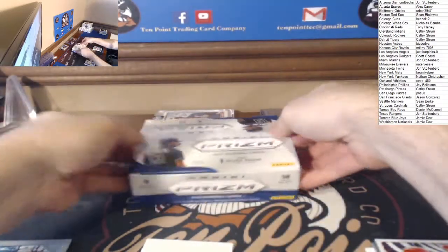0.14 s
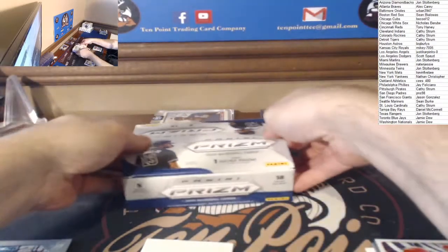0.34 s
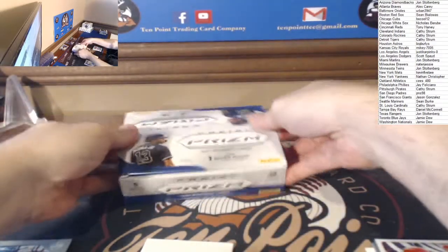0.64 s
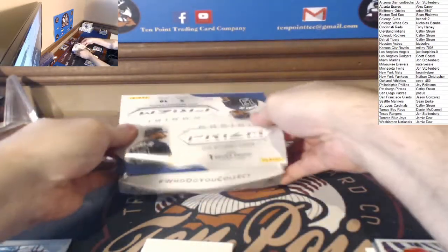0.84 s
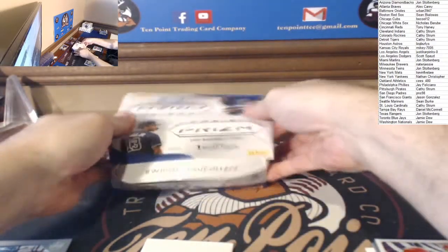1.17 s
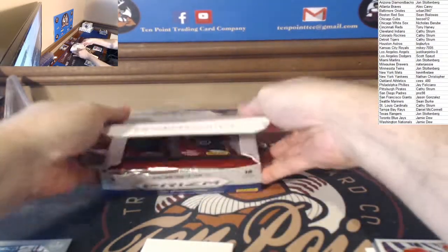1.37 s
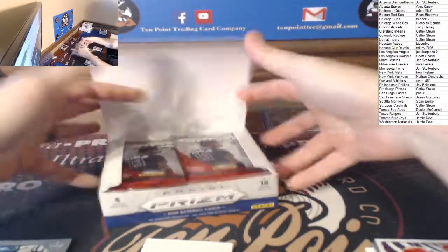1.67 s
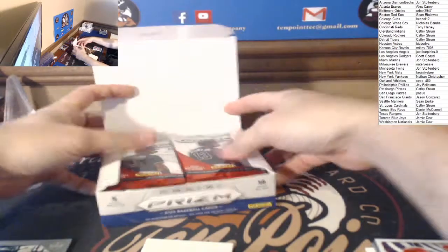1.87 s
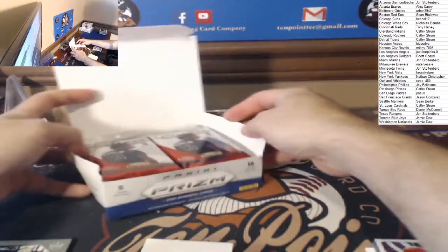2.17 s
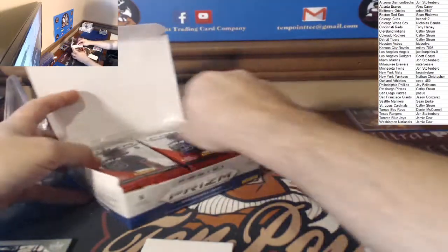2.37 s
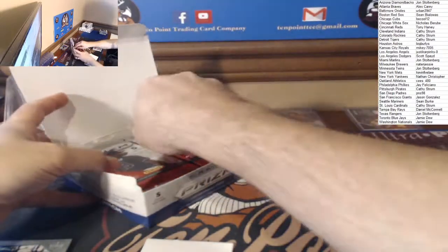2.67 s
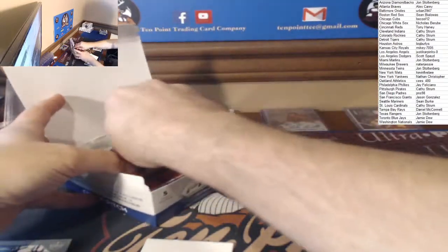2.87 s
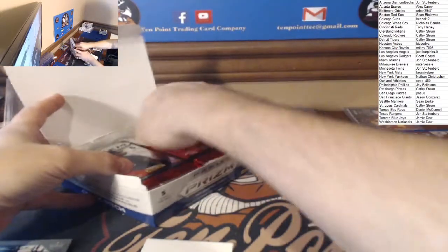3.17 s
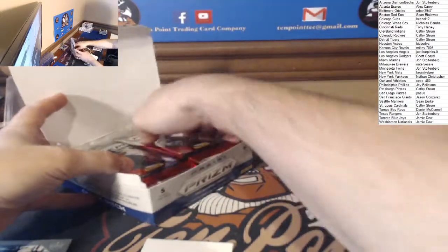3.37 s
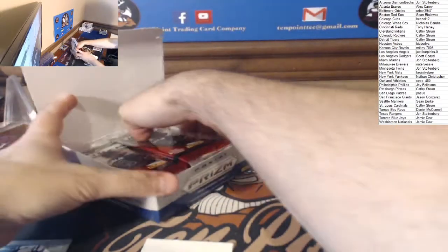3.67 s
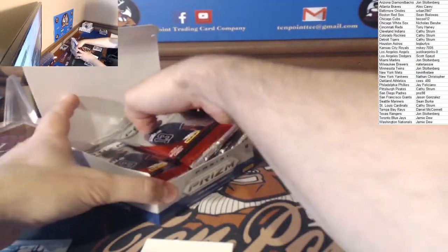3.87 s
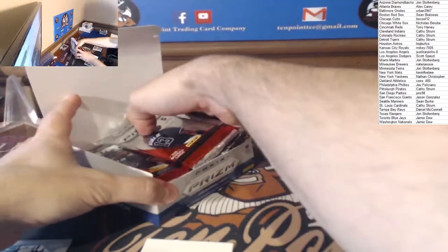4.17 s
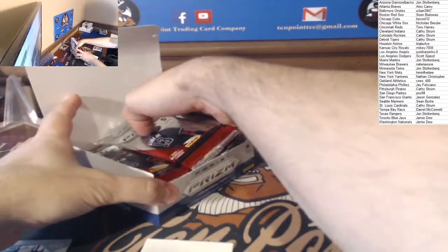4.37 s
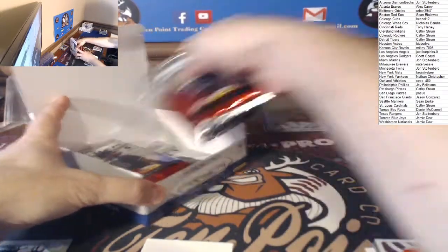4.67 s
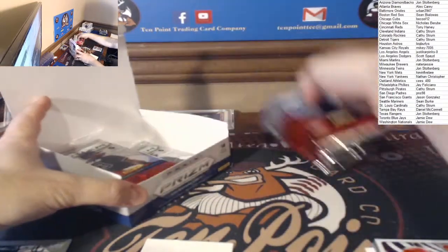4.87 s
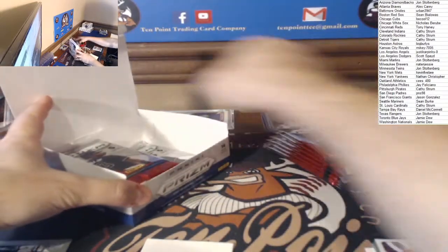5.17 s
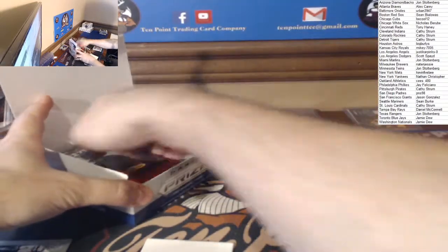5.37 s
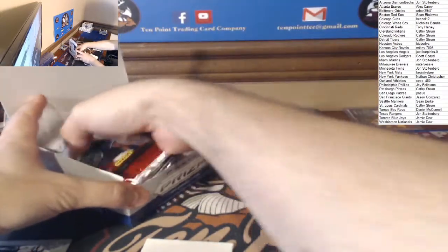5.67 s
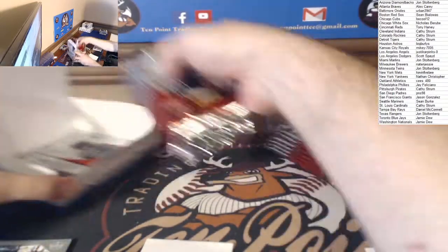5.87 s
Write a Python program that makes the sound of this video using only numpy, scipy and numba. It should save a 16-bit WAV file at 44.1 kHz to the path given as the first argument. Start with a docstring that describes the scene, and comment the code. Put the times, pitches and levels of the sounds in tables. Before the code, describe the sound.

Close, dry card rubs and hollow snaps, a faint lid creak, then busy foil crinkling as two stacks of packs are pulled out.

```python
"""Faint rubs and snaps of card come first: a box of trading cards is opened by hand on a padded mat.
Its lid rubs (stick-slip grains), creaks (gliding sines, low knocks), snaps free of its tabs and is
folded back. Then two stacks of foil packs are gripped, dragged out crinkling (showers of clicks ringing
small facets) and set down with soft low bumps (decaying sines and noise puffs). A small room answers with
early echoes and a decaying noise tail; a close, nearly mono desk microphone listens over faint noise."""
import sys
import numpy as np
from scipy import signal
from scipy.fft import rfft, irfft, next_fast_len
from scipy.io import wavfile
from scipy.ndimage import uniform_filter1d, map_coordinates
from numba import njit

SR = 44100
rng = np.random.default_rng(int(sys.argv[2]) if len(sys.argv) > 2 else 0)


def store_pcm(level_fs):
    """Save levels as 16-bit WAV."""
    pcm = np.round(np.clip(level_fs, -1, 1) * 32767).astype(np.int16)
    wavfile.write(sys.argv[1], SR, np.atleast_2d(pcm).T)


N = 265482
TIME = np.arange(N) / SR


def cardboard():
    """Superposition: the rubs, squeaks and snaps add linearly."""
    return rubs() + card_squeaks() + card_snaps()


# card edges and tabs snapping; bass and treble are relative to the middle, before the shared trims:
# start_s, level_db, bass_db, treble_db, ring_hz, slip_ms
CARD_SNAPS = [(0.1307, -33, -17, -14.5, 870, 2.2), (0.1694, -48, -26, -31, 980, 7.7),
              (0.2233, -44.5, -31, -1.5, 1390, 1.6), (0.2357, -37, -31, -35, 1370, 3.8),
              (0.252, -47, -25, 11, 1870, 1.5), (0.3525, -46.5, -20, -34, 1220, 12.5),
              (0.3724, -49.5, -23, -4, 1470, 1.1), (0.4016, -30, -10.5, -4, 1180, 2.9),
              (0.4069, -34, 3, -26, 900, 4.3), (0.4172, -40, -23, -3, 1110, 1.3),
              (0.4675, -25, -6, -23, 1370, 1.8), (0.5686, -21.5, -9.5, -25, 1410, 1.34),
              (0.5938, -28.5, -3, -22, 1350, 0.5), (0.6005, -27.5, 0, -21, 1460, 2.4),
              (0.7343, -44, -19, -23, 1260, 3.3), (0.786, -31, -5, -19, 1274, 1.6),
              (0.7909, -21, -45, -37, 1266, 0.32), (0.7939, -21.5, 11, -1.5, 940, 5.8),
              (0.8249, -24, -30, -7.5, 1780, 9.6), (0.8355, -16.5, -2.5, -35, 1100, 2.8),
              (0.8687, -27, -5.5, -6.5, 2410, 11.6), (1.1317, -27, -6, -15.5, 1700, 3.8),
              (1.1641, -32, 3.5, -5.5, 1597, 2.2), (1.1848, -27.5, -18, -10, 1690, 1.5),
              (1.2117, -37.5, -7, -5, 1390, 1.9), (1.2214, -38.5, -13, -13, 1260, 1.2),
              (1.2329, -37.5, -4.5, -6, 1326, 1.7), (1.2897, -11.5, -14.5, -14, 1230, 2),
              (1.292, -7, -12, -18.5, 1236, 3), (1.2955, -19, 1.5, -8, 2250, 1.3),
              (1.3055, -22, 5, -1, 1360, 9.5), (1.3122, -9, -3, -14.5, 1860, 2.6),
              (1.3142, -13.5, -13, -22, 1089, 3.9), (1.486, -49, -3, 1, 1300, 5.6),
              (1.509, -43.5, -14, 20, 1260, 2.5), (1.559, -49, -6, 1, 5800, 3.5),
              (1.5885, -42, -5, 16, 6490, 3.4), (1.622, -48, 6.5, -5.5, 1050, 3.6),
              (1.641, -57, 16, 2, 3300, 4.4), (1.6765, -30.5, -17.5, -3.5, 1710, 3.4),
              (1.6816, -35.5, -37, -2.5, 1560, 6.6), (1.8344, -45, 13, 14, 3490, 0.97),
              (1.8802, -38, 1, -17.5, 457, 10.1), (1.9384, -42, -21, -21.5, 2350, 3.6),
              (1.9684, -46.5, -5.5, 13, 4500, 1.07), (2.1215, -40, -5.5, -3.5, 935, 2.3),
              (2.173, -37.5, 0.5, -3, 497, 4.3), (2.2641, -41, -14.5, 29, 5100, 2.16),
              (2.7021, -41.5, -18.5, -2, 1890, 2.6), (2.752, -56.5, -7, -16, 900, 8),
              (2.797, -60, 8.5, -4.5, 1297, 14.3)]


def card_snaps():
    """Impulse excitation: sudden releases of edges and tabs set the hollow box ringing."""
    return snaps(CARD_SNAPS, box, rough=0.12, ring_q=5, ring_db=8, bass_db=1.5, treble_db=-2,
                 after_db=-23, after_ms=14, after_per_s=770, facet_db=0)


# strokes of fingers and flaps over the card, later of fingers and packs sliding; level is at the
# start, before the mix trim, and swell is its change over the stroke; bass and treble are relative
# to the middle: start_s, length_s, level_db, swell_db, bass_db, treble_db, ring_hz
RUB_STROKES = [(0.0, 0.024, -39.5, -33.5, -1.5, -23, 1340), (0.045, 0.039, -66, 11, -18, -5, 850),
               (0.09, 0.037, -58.5, 12, -2, -15, 950), (0.15, 0.061, -48, -18, -21, -12, 1000),
               (0.222, 0.074, -59.5, 6, -12, -4.5, 1330), (0.29, 0.1, -48, -23, -13, -17, 1090),
               (0.405, 0.069, -57.5, -9.5, 8, -19, 1100), (0.475, 0.07, -51, -13, 10, -12.5, 1050),
               (0.631, 0.1, -51, -26, 4, -17, 1160), (0.745, 0.038, -51.5, -5.5, -22, -9, 1350),
               (0.8, 0.052, -50, 19.5, -8.5, -14, 1180), (0.835, 0.079, -36.5, -12.5, -2, -8, 2440),
               (0.89, 0.096, -44.5, 2.5, -2.5, -20, 1140), (1.0, 0.11, -45, -9.5, 0.5, -28, 1360),
               (1.135, 0.037, -40, 1, -1.5, -13, 1060), (1.18, 0.064, -50.5, 2, -10, -9, 1330),
               (1.315, 0.17, -34.5, -24, 0.5, -30, 1250), (1.32, 0.079, -41, -11, -17, -7.5, 3396),
               (1.45, 0.059, -59.5, 15, -14, -6, 1200), (1.55, 0.065, -62, 1, -4, 6.5, 790),
               (1.615, 0.052, -51, -14, -7, -5, 2760), (1.672, 0.026, -44.5, -17, 3.5, 3.5, 1580),
               (1.835, 0.015, -54.5, 0.5, -10.5, -12.5, 2960), (1.917, 0.055, -61, 9, -5.5, 1, 2597),
               (2.11, 0.089, -49.5, -2.5, -7, -8, 2300), (2.225, 0.086, -50.5, -14.5, -8.5, -10.5, 2500),
               (2.34, 0.064, -66.5, -13.5, 12.5, -7.5, 700), (2.42, 0.13, -79.5, -5, -0.5, -8.5, 900),
               (2.55, 0.055, -67.5, -8, -2.5, -8, 791), (2.712, 0.023, -62, -2.5, -3.5, -13, 1700),
               (4.14, 0.085, -45, -21.5, -17, -15.5, 944), (4.338, 0.019, -44.5, -4, -10, -19.5, 1990),
               (4.358, 0.074, -53, -19, -1.5, -15, 1473), (5.755, 0.089, -62, -16, 5.5, -16, 555)]
# spectral envelope of the friction: frequency_hz, level_db (relative)
RUB_SPECTRUM = [(29, -58), (50, -32), (132, -26.5), (203, -7), (299, -2.5), (423, -8.5), (524, -3),
                (584, -5), (843, -7.5), (1100, -3.5), (1440, -1.5), (1850, -4), (2300, -7.5), (3070, -13.5),
                (3800, -18.5), (4900, -14.5), (6540, -23.5), (7940, -31), (8650, -41), (11200, -78),
                (19000, -120)]


def rubs():
    """Stick-slip friction: fibres catch and slip, heard directly and through the box; gloss ticks finely."""
    fibres = grains(per_s=3400, spread_db=0.5, even_s=0.0061)
    catches = grains(per_s=260, spread_db=2, even_s=0.02)
    slips = rms_one(fibres) + from_db(-3) * rms_one(catches)
    slips = facets(slips, q=3.4, patchy_db=3.5, change_rate=60)
    slips = pocket(slips, gap_ms=1.3, wander=0.3, change_rate=25, echo_db=-8)
    slips = rms_one(colour(slips, RUB_SPECTRUM))

    hollow = box(grains(per_s=1500, spread_db=3, even_s=0.006))
    hollow = rms_one(butter(hollow, 1900, "low", order=4))

    gloss = grains(per_s=240, spread_db=2.5, even_s=0.02)
    for _ in range(2):
        gloss = resonance(gloss, hz=6000, width_hz=2600)

    friction = slips + from_db(-2.5) * hollow + from_db(-15) * rms_one(gloss)
    rubbed = strokes(RUB_STROKES, friction, attack_s=0.005, release_s=0.006,
                     ring_db=-2, ring_q=4, ring_rise=0.25)
    return from_db(-2.5) * rubbed


# squeaks as the box is turned and its flap bent; pitch is at the start, before it wavers, and
# level is before the flutter: start_s, length_s, pitch_hz, rise_hz, level_db
SQUEAKS = [(1.015, 0.076, 254, 34.7, -57.5), (1.801, 0.027, 380, 132, -59.5),
           (1.88, 0.04, 385.1, 49.7, -56.5), (1.929, 0.02, 810, 27, -48), (2.131, 0.102, 440, 90.5, -53.5),
           (2.229, 0.08, 707, 23.2, -59.5), (2.342, 0.066, 268, 50.3, -57.5)]


def card_squeaks(wander=0.075, flutter_db=6.5, flutter_rate=200):
    """Periodic stick-slip: short unsteady tones rise in pitch as the slip speeds up."""
    out = np.zeros(N)
    waver = 1 + wander * drift(flutter_rate)
    for start_s, length_s, pitch_hz, rise_hz, level_db in SQUEAKS:
        t = TIME - start_s
        pitch = (pitch_hz + rise_hz * np.clip(t / length_s, 0, 1)) * waver
        tone = np.sin(2 * np.pi * np.cumsum(pitch) / SR)
        out += from_db(level_db) * envelope(t, length_s, attack_s=0.0048, release_s=0.0037) * tone
    return out * from_db(flutter_db * drift(flutter_rate))


# resonances of the box, added with alternating sign: frequency_hz, width_hz, level_db (relative)
BOX_MODES = [(160, 22, -14.5), (315, 97, 1), (540, 92, 3), (673, 86, 8.5), (900, 170, 12.5),
             (1230, 240, 11), (1442, 200, 15), (2010, 857, 5.5), (2300, 290, -8.5), (3240, 300, -33.5),
             (5000, 170, -24), (5300, 700, -28.5), (7100, 1400, -13)]


def box(force):
    """Modal superposition: card panels and enclosed air ring together, all setting in at once."""
    grid = np.geomspace(30, 20000, 300)
    response = 0
    for k, (hz, width_hz, level_db) in enumerate(BOX_MODES):
        detuning = (grid ** 2 - hz ** 2) / (grid * width_hz)
        response = response + (-1) ** k * from_db(level_db) / (1 + 1j * detuning)
    return colour(force, np.transpose([grid, 20 * np.log10(np.abs(response))]))


def foil_packs():
    """Superposition: sliding wrappers rustle while single creases buckle."""
    return foil_rustle() + foil_buckles()


# spectral envelope of the foil: frequency_hz, level_db (relative)
FOIL_SPECTRUM = [(35, -63), (60, -38.5), (150, -25), (220, -11.5), (330, -5), (451, -3.5), (540, 3),
                 (680, -2.5), (974, 4.5), (1250, 0), (1820, 2), (2290, -1.5), (2600, -3.5), (3600, -13.5),
                 (4730, -16.5), (6300, -19.5), (7400, -20.5), (8650, -31.5), (11200, -84), (19000, -120)]
# tugs and slides of the packs; level is at the start, before the mix trim, and swell is its
# change over the tug; bass and treble are relative to the middle:
# start_s, length_s, level_db, swell_db, bass_db, treble_db, ring_hz
TUGS = [(2.947, 0.051, -55, 11, 2.5, -5, 970), (3.02, 0.15, -55, 11.5, -2.5, -9.5, 606),
        (3.135, 0.034, -39.5, -11.5, -23, -2, 5360), (3.2, 0.1, -49, 10.5, -5, -6.5, 525),
        (3.29, 0.18, -51.5, 8, -2, -6.5, 1900), (3.475, 0.073, -47.5, 9, -17, -12, 650),
        (3.53, 0.029, -49, -3, -15, -4, 1900), (3.56, 0.071, -43, 4.5, -12.5, -8.5, 1700),
        (3.605, 0.039, -43, 15, -10.5, -11.5, 1010), (3.65, 0.041, -34, 3, -11.5, -4, 1040),
        (3.705, 0.05, -45, 16.5, -25, -8, 1400), (3.735, 0.075, -41.5, 10.5, -4.5, 1.5, 1870),
        (3.82, 0.06, -36, -8, 4, -5, 980), (3.872, 0.027, -39.5, -0.5, -4.5, -7.5, 1750),
        (3.9, 0.091, -43, -5, -18, -9.5, 980), (3.961, 0.039, -42, -1, -7, -13, 970),
        (4.02, 0.025, -41.5, -2, -11.5, -12, 1110), (4.13, 0.31, -60.5, -29.5, -16, -14.5, 2970),
        (4.232, 0.015, -44.5, -2.5, 1.5, -10, 1400), (4.4, 0.055, -62.5, 7, -9, -3.5, 7100),
        (4.49, 0.035, -59.5, -12, 12, -1.5, 2320), (4.53, 0.035, -57.5, 19.5, -10, -1.5, 1760),
        (4.6, 0.044, -31, -8.5, -10, -2.5, 900), (4.685, 0.016, -53.5, -1, 0, -34.5, 815),
        (4.78, 0.24, -84.5, 8, -1.5, 4.5, 1950), (4.955, 0.037, -45, -16, -19, -5, 1684),
        (5.01, 0.039, -46.5, -22, 3.5, 8, 4900), (5.36, 0.15, -81.5, 13, 10, 5, 1947),
        (5.438, 0.0099, -41, -0.5, -10, -5, 820), (5.495, 0.12, -54.5, 1, -16, -6, 1050),
        (5.54, 0.041, -43, -7, -11, -4, 795), (5.595, 0.066, -49, 16, -6.5, -4, 1070),
        (5.668, 0.069, -40.5, 5, -0.5, 0, 2000), (5.76, 0.13, -47.5, -17.5, -19, -6.5, 2170)]


def foil_rustle():
    """Shot noise: wrappers slide while their creases buckle in showers of fine clicks."""
    creases = grains(per_s=650, spread_db=2.3, even_s=0.014)
    creases = facets(creases, q=7, patchy_db=5, change_rate=130)
    sliding = grains(per_s=4000, spread_db=1.5, even_s=0.0098)
    sliding = facets(sliding, q=3.4, patchy_db=3, change_rate=60)
    ticks = crackle(per_s=330, spread_db=1.5, q=6)
    sheet = rms_one(creases) + from_db(-4) * rms_one(sliding)
    sheet = pocket(sheet, gap_ms=1.4, wander=0.35, change_rate=30, echo_db=-7)
    crinkle = colour(rms_one(sheet) + from_db(-4) * ticks, FOIL_SPECTRUM)
    tugs = strokes(TUGS, crinkle, attack_s=0.0026, release_s=0.01, ring_db=0, ring_q=6, ring_rise=0.12)
    return from_db(-4.5) * tugs


# single buckles of the wrappers; level is before the mix trim, treble is relative to the middle
# before the shared trim: start_s, level_db, treble_db, ring_hz, slip_ms
FOIL_SNAPS = [(2.9481, -38, -0.5, 417, 6.5), (2.976, -38, 1, 1000, 11), (2.9868, -31, 3, 1720, 9.5),
              (3.0272, -37, 6, 4900, 1.8), (3.0345, -36.5, -4, 2010, 2.3), (3.0595, -34.5, 5.5, 6900, 7),
              (3.077, -35.5, 21, 4230, 1.4), (3.0961, -31, -8, 2020, 4.1), (3.1035, -52, -14, 2000, 1.2),
              (3.1213, -43, -23, 654, 4), (3.187, -33.5, -11, 750, 6.6), (3.246, -31.5, -1, 4600, 1.1),
              (3.2551, -29.5, 4, 4000, 2), (3.275, -30.5, 5, 1000, 1.3), (3.341, -34.5, -10, 5000, 1),
              (3.3227, -25, 1, 5130, 0.42), (3.353, -29, -0.5, 5340, 1.7), (3.382, -35, -2, 1900, 1.8),
              (3.3978, -26, -2, 1970, 21), (3.4284, -38, 2, 2500, 2.1), (3.496, -45, 0, 2230, 1),
              (3.5401, -25, -7, 2440, 4.4), (3.5515, -24, -2, 1780, 0.54), (3.5688, -32.5, 4, 2120, 3),
              (3.6501, -20.5, -16, 1570, 3.4), (3.6774, -25, -13, 1450, 1.5),
              (3.692, -23.5, -18, 1360, 5.3), (3.736, -24, -12, 1600, 3.9), (3.748, -18, -11, 990, 1.4),
              (3.7754, -20, 8, 2000, 2.4), (3.7869, -17.5, 2.5, 3750, 8.7), (3.809, -24.5, -17, 4170, 2.8),
              (3.8365, -20, -26, 1000, 1.5), (3.878, -21.5, 4, 3570, 4.3), (3.8928, -19.5, -2.5, 1810, 2.7),
              (3.92, -25.5, -34, 1380, 1), (3.931, -31, -9, 2180, 0.9), (3.964, -31.5, 3, 4300, 2.5),
              (3.9696, -24, -15, 980, 4.4), (3.9794, -26.5, 4, 4500, 1.1), (3.992, -44, -3, 4300, 1),
              (4.0102, -31, 5, 3110, 0.5), (4.0308, -29, -6.5, 2120, 2.9),
              (4.1309, -27.5, 10.5, 4000, 0.21), (4.1613, -33.5, 4, 1100, 0.57),
              (4.2331, -34, -23.5, 1330, 3.4), (4.246, -45, -2.5, 1470, 2), (4.235, -38, 23, 6900, 9.7),
              (4.3509, -25, -22.5, 1265, 0.32), (4.4434, -41, 22, 6860, 7.9),
              (4.4926, -38, -10.5, 530, 0.22), (4.539, -34, 2, 6550, 1.5), (4.5646, -30.5, -22, 2940, 3),
              (4.601, -32.5, 3, 1900, 3.2), (4.6095, -29, -22, 925, 8.1), (4.629, -23.5, 4, 3460, 1.5),
              (4.655, -32.5, 2, 1990, 4.1), (5.008, -32.5, 7.5, 1100, 0.66), (5.0132, -25, 13.5, 5730, 1.1),
              (5.025, -49.5, 16.5, 4920, 0.77), (5.312, -60, -2.5, 1300, 4.7),
              (5.3542, -44.5, 1.5, 1160, 8.7), (5.367, -54.5, 6.5, 6500, 2.1),
              (5.396, -47.5, 24, 5000, 1.1), (5.4471, -34, -2.5, 1170, 4.4), (5.49, -35.5, -4, 1320, 2),
              (5.5115, -41, -6, 6000, 0.72), (5.539, -30, -0.5, 1580, 8), (5.5948, -31.5, -4, 1900, 3),
              (5.617, -29.5, -8, 3460, 1.8), (5.643, -21.5, -9, 1110, 4.8), (5.66, -26.5, -14, 1200, 3.1),
              (5.6916, -16, -13, 760, 0.28), (5.7317, -25, -1, 2180, 6.4), (5.741, -20.5, -4.5, 2214, 8.9),
              (5.844, -44, 6, 3810, 1.7), (5.899, -46.5, -3, 2300, 1.6), (5.912, -56.5, 15.5, 6000, 0.9),
              (5.9286, -39.5, 16, 3000, 0.83)]


def foil_buckles():
    """Snap-through buckling: each crease jumps between two shapes; light foil gives little bass."""
    bass_db = -10
    rows = [(start_s, level_db, bass_db, treble_db, ring_hz, slip_ms)
            for start_s, level_db, treble_db, ring_hz, slip_ms in FOIL_SNAPS]
    buckles = snaps(rows, lambda force: colour(force, FOIL_SPECTRUM), rough=0.055, ring_q=4.6,
                    ring_db=20, bass_db=-3.5, treble_db=-3, after_db=-8, after_ms=7.5,
                    after_per_s=1700, facet_db=10.5)
    return from_db(-7) * buckles


# soft bumps of hands, box and packs, and low knocks of the creaking lid; peak is before the mix trim:
# start_s, peak_db, pitch_hz, t60_s
BUMPS_AND_KNOCKS = [(0.112, -32.5, 309, 0.12), (0.5, -34, 172, 0.022), (0.633, -37, 303, 0.075),
                    (1.289, -24.5, 140.4, 0.12), (1.453, -39.5, 136, 0.067), (1.482, -30.5, 315, 0.092),
                    (1.527, -43.5, 310, 0.06), (1.594, -47, 450, 0.04), (1.613, -38, 820, 0.034),
                    (1.639, -36.5, 457, 0.039), (1.667, -42.5, 150, 0.074), (1.74, -38.5, 290, 0.04),
                    (1.846, -36, 203, 0.051), (1.878, -33.5, 340, 0.018), (1.965, -27.5, 583, 0.03),
                    (2.29, -41, 260, 0.15), (2.8, -54, 260, 0.028), (2.95, -38, 260, 0.045),
                    (2.986, -31, 251, 0.047), (3.12, -23, 617, 0.027), (3.134, -18, 540, 0.019),
                    (3.134, -38, 235, 0.06), (3.547, -42.5, 146, 0.17), (3.608, -39, 302, 0.049),
                    (3.927, -44.5, 160, 0.052), (4.23, -36.5, 274, 0.014), (4.62, -32, 333, 0.057),
                    (4.682, -36.5, 311, 0.061), (4.691, -34, 750, 0.025), (4.92, -29.5, 497, 0.03),
                    (4.932, -40.5, 175, 0.097), (5.004, -26, 311, 0.018), (5.021, -33, 172, 0.048),
                    (5.067, -45, 160, 0.06), (5.365, -46, 163.2, 0.099), (5.44, -34, 203, 0.08)]


def bumps_and_knocks(contact_s=0.002, puff_db=-2.5, size=12000):
    """Damped oscillation: each bump or knock swells briefly, then rings low with a puff and a desk thud."""
    thud_hz, thud_db = 59.74, -2   # the level holds for a bump at the thud's own pitch
    out = np.zeros(N)
    t = np.arange(size) / SR
    noises = rng.standard_normal((len(BUMPS_AND_KNOCKS), size))
    for (start_s, peak_db, hz, t60_s), noise in zip(BUMPS_AND_KNOCKS, noises):
        ring = np.sin(2 * np.pi * hz * t)
        puff = from_db(puff_db) * rms_one(butter(noise, [hz * 0.51, hz * 1.19], "band"))
        # the lower the pitch, the more it shakes the desk
        thud = from_db(thud_db) * (thud_hz / hz) ** 2 * np.sin(2 * np.pi * thud_hz * t)
        onset = 1 - np.exp(-(t / contact_s) ** 2)
        bump = (ring + puff + thud) * onset * from_db(-60 * t / t60_s)
        add(out, start_s, from_db(peak_db) * bump / np.abs(bump).max())
    return from_db(-5) * out


# echoes from the desk, lid and nearby screens: delay_ms, level_db (relative to the direct sound)
ECHOES = [(1.05, -38), (2.4, -18), (3.25, -25.5), (3.8, -25.5), (7.2, -18)]


def desk(x):
    """Early reflection: the desk top booms a little and hard surfaces return the sound within milliseconds."""
    out = x + from_db(-5) * resonance(x, hz=160, width_hz=45)
    for delay_ms, level_db in ECHOES:
        add(out, delay_ms / 1000, from_db(level_db) * x)
    return out


# the room's tail, before the overall level and the late fade: frequency_hz, level_db, t60_s
ROOM = [(100, 12.5, 0.048), (260, 7.5, 0.073), (700, -7, 0.15), (1930, 0, 0.14), (4500, -6.5, 0.1),
        (8280, -27, 0.52)]


def room(x, wet_db=-34, build_s=0.00031, end_s=0.3, size=20000):
    """Reverberation: dense reflections thicken at once and decay exponentially, band by band."""
    t = np.arange(size) / SR
    edges = 60 * 2 ** np.arange(9)   # octave bands
    hz, db, t60_s = np.transpose(ROOM)
    tail = 0
    for low, high, noise in zip(edges, edges[1:], rng.standard_normal((8, size))):
        centre = np.log(low * high) / 2
        fall_db = np.interp(centre, np.log(hz), db) - 60 * t / np.interp(centre, np.log(hz), t60_s)
        tail = tail + butter(noise, [low, high], "band") * from_db(fall_db)
    # the late tail falls away quickly
    tail = tail * (1 - np.exp(-t / build_s)) * np.exp(-(t / end_s) ** 4)
    return from_db(wet_db) * signal.fftconvolve(x, tail)[:N]


# spectral envelope of the background noise: frequency_hz, level_db (relative)
AIR_SPECTRUM = [(24, -40), (40, -8.5), (198, 0), (556, -8.5), (636, -9), (1250, -20.5), (1670, -10.5),
                (3210, -19), (4510, -25.5), (8650, -27.5), (11200, -56), (19000, -120)]


def air():
    """Filtered noise: a steady, faint background with a fixed spectral envelope."""
    return from_db(-79) * rms_one(colour(rng.standard_normal(N), AIR_SPECTRUM))


# side signal re mid, before its flutter and trim: frequency_hz, level_db
PORTS = [(60, -17.5), (250, -17), (1000, -17), (2000, -29.5), (4000, -11), (8000, -18.5)]


def ports(mid):
    """Mid-side difference: ever-changing directions of arrival make two close ports differ a little."""
    side = from_db(2.5) * colour(mid * np.tanh(drift(110)), PORTS)
    return np.array([mid + side, mid - side])


def snaps(table, body, rough, ring_q, ring_db, bass_db, treble_db,
          after_db, after_ms, after_per_s, facet_db, size=4096):
    """Energy release: creep, sudden slip and late crackles ring the freed panel and chance facets near it."""
    lead = size // 8   # room for the creep before the release
    out = np.zeros(N)
    ms = 1000 * (np.arange(size) - lead) / SR
    noises = rng.standard_normal((len(table), size))
    luck = rng.random((len(table), size))
    facet_hz = 900 * 2 ** rng.uniform(0, 3, (len(table), 4))
    for row, noise, dice, pitches in zip(table, noises, luck, facet_hz):
        start_s, level_db, bass, treble, hz, slip_ms = row
        micro_slips = (ms > 0) * rough * noise * np.abs(noise) * np.exp(-(ms / slip_ms) ** 2)
        release = (ms == 0) + micro_slips
        # the edge creeps faintly before it lets go
        creep = from_db(-34) * (ms < 0) * noise * np.exp(-np.abs(ms) / 2.5)
        # neighbouring creases give way one by one as the sheet settles
        gives_way = (ms > 0) * (dice < after_per_s / SR)
        settling = gives_way * np.tanh(noise) * np.exp(-np.abs(ms) / after_ms)
        settling = from_db(after_db) * np.sqrt(np.sum(release ** 2)) * settling
        sound = body(creep + release + settling)

        panel = from_db(ring_db) * resonance(sound, hz, hz / ring_q)
        around = from_db(facet_db) * sum(resonance(sound, pitch, pitch / 12) for pitch in pitches)
        low, middle, high = registers(sound + panel + around)
        snap = from_db(bass + bass_db) * low + middle + from_db(treble + treble_db) * high
        loudest = np.sqrt(uniform_filter1d(snap ** 2, size=88).max())   # short-time rms over 2 ms
        add(out, start_s - lead / SR, from_db(level_db) * snap / loudest)
    return out


def strokes(table, friction, attack_s, release_s, ring_db, ring_q, ring_rise):
    """Driven resonance: the rubbed sheet rings at a wavering pitch that follows the swell of pressure."""
    out = np.zeros(N)
    waver = np.exp(0.088 * drift(45))
    for start_s, length_s, level_db, swell_db, bass_db, treble_db, hz in table:
        span = slice(int(start_s * SR), int((start_s + length_s + 0.07) * SR))
        t = TIME[span] - start_s
        progress = np.clip(t / length_s, 0, 1)
        pitch = hz * waver[span] * np.exp(ring_rise * np.tanh(swell_db / 10) * (progress - 0.5))
        ring = from_db(ring_db) * sliding_resonance(friction[span], pitch, float(ring_q))
        low, middle, high = registers(friction[span] + ring)
        pressure = from_db(level_db + swell_db * progress) * envelope(t, length_s, attack_s, release_s)
        out[span] += pressure * (from_db(bass_db) * low + middle + from_db(treble_db) * high)
    return out


def grains(per_s, spread_db, even_s):
    """Random impulses: tiny slips of uneven size, their power evened over even_s by the steady hand."""
    sizes = from_db(spread_db * np.minimum(rng.exponential(1, N), 4)) * rng.choice([-1, 1], N)
    clicks = sizes * (rng.random(N) < per_s / SR)
    power = uniform_filter1d(clicks ** 2, int(even_s * SR))
    return clicks / np.sqrt(np.abs(power) + np.mean(power) / 20)


def crackle(per_s, spread_db, q, count=12):
    """Impulse response: each tick of a tight crease is a bare click and a very short ring."""
    clicks = grains(per_s, spread_db, even_s=0.022)
    dealt = rng.integers(0, count, N)   # which pitch each click rings
    rings = 0
    for k, hz in enumerate(np.geomspace(1200, 7000, count)):
        rings = rings + rms_one(resonance(clicks * (dealt == k), hz, hz / q))
    return rms_one(rms_one(rings) + rms_one(clicks))


def facets(clicks, q, patchy_db, change_rate, count=26):
    """Parallel resonators: clicks ring small facets, and which are loose keeps changing with the grip."""
    out = 0
    for hz in np.geomspace(70, 8500, count):
        out = out + from_db(patchy_db * drift(change_rate)) * resonance(clicks, hz, hz / q)
    return out


def pocket(x, gap_ms, wander, change_rate, echo_db):
    """Comb filtering: the changing air gap between sheet and hand makes its resonances slide about."""
    at = np.arange(N)
    lag = gap_ms / 1000 * SR * np.exp(wander * drift(change_rate))
    once = map_coordinates(x, [at - lag], order=3)
    twice = map_coordinates(once, [at - lag], order=3)
    return x + from_db(echo_db) * once + from_db(2 * echo_db) * twice


def envelope(t, length_s, attack_s, release_s):
    """Contact transient: it builds up from t = 0, holds to length_s and then decays exponentially."""
    t = np.maximum(t, 0)
    return (1 - np.exp(-(t / attack_s) ** 2)) * np.exp(-np.clip((t - length_s) / release_s, 0, 20))


def drift(rate):
    """Random modulation: a slow chance signal at rms 1 that changes about rate times a second."""
    knots = rng.standard_normal(2048)
    return rms_one(np.interp(TIME * rate, np.arange(len(knots)), knots))


def resonance(x, hz, width_hz):
    """Simple resonator: two poles, with gain 1 on top."""
    r = np.exp(-np.pi * width_hz / SR)
    poles = [1, -2 * r * np.cos(2 * np.pi * hz / SR), r * r]
    return signal.lfilter([(1 - r * r) / 2, 0, (r * r - 1) / 2], poles, x + 1e-18)


@njit
def sliding_resonance(x, hz, q):
    """State-variable resonator: its centre moves from sample to sample; hz / q is its width."""
    out, band, low = np.zeros(len(x)), 0., 0.
    for i in range(len(x)):
        g = np.tan(np.pi * min(hz[i], SR / 3) / SR)
        out[i] = (band + g * (x[i] - low)) / (1 + g * (g + 1 / q))
        band, low = 2 * out[i] - band, low + 2 * g * out[i]
    return out


def registers(x):
    """Zero-phase band splitting: bass, middle and treble, each at rms 1, keep clicks compact."""
    bass = signal.sosfiltfilt(signal.butter(3, 600, "low", fs=SR, output="sos"), x + 1e-18)
    treble = signal.sosfiltfilt(signal.butter(6, 3300, "high", fs=SR, output="sos"), x + 1e-18)
    return [rms_one(bass), rms_one(x - bass - treble), rms_one(treble)]


def colour(x, spectrum):
    """Minimum-phase filtering: a causal filter follows the given (Hz, dB) curve."""
    size = next_fast_len(len(x) + 2048) * 2
    hz, db = np.transpose(spectrum)
    grid = np.maximum(np.fft.rfftfreq(size, 1 / SR), 1)
    cepstrum = irfft(np.log(from_db(np.interp(np.log(grid), np.log(hz), db))))
    # folding the cepstrum onto positive times makes the phase minimal
    cepstrum[1:size // 2] *= 2
    cepstrum[size // 2 + 1:] = 0
    return irfft(rfft(x, size) * np.exp(rfft(cepstrum)))[:len(x)]


def butter(x, hz, kind, order=2):
    """Maximally flat filtering: a causal Butterworth filter."""
    return signal.sosfilt(signal.butter(order, hz, kind, fs=SR, output="sos"), x + 1e-18)


def from_db(db):
    """Logarithmic level: decibels to amplitude gain."""
    return 10 ** (np.asarray(db) / 20)


def rms_one(x):
    """Effective value: scale to rms 1."""
    return x / np.sqrt(np.mean(x ** 2) + 1e-20)


def add(track, start_s, sound):
    """Superposition: mix a sound into a track from start_s on."""
    start = int(np.clip(round(start_s * SR), 0, N - 1))
    track[start:start + len(sound)] += sound[:N - start]


def scene():
    """Direct and reflected sound: box, packs, bumps and knocks in the room, picked up by two close ports."""
    direct = cardboard() + foil_packs() + bumps_and_knocks()
    return ports(desk(direct) + room(direct) + air())


def record(dry):
    """Saturation and band limiting: hard peaks are rounded, deep bass shed and the top cut steeply."""
    headroom = 0.7
    rounded = headroom * np.tanh(dry / headroom)
    without_bass = butter(rounded, 62, "high", order=4)
    passband = butter(without_bass, 7570, "low", order=6)
    return signal.sosfilt(signal.cheby1(10, 0.2, 8700, fs=SR, output="sos"), passband)


dry = scene()
out = record(dry)
store_pcm(out)
```